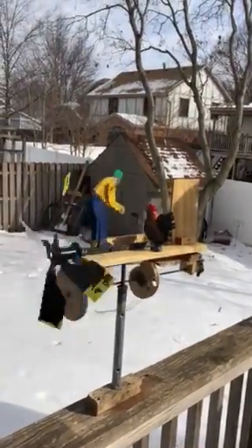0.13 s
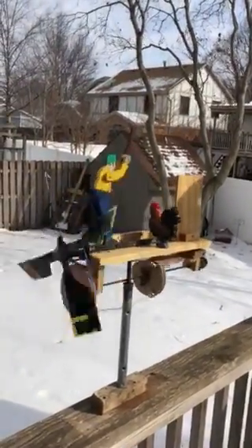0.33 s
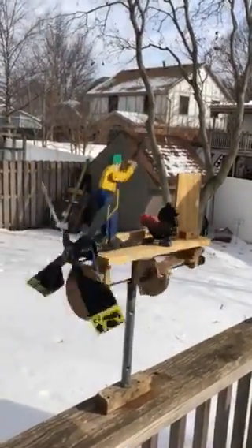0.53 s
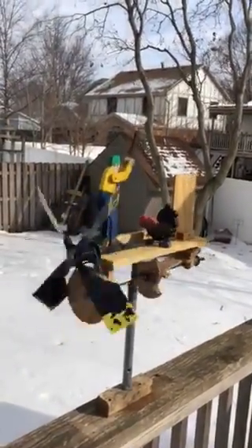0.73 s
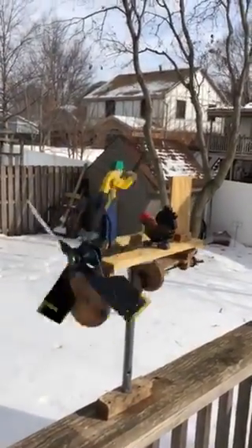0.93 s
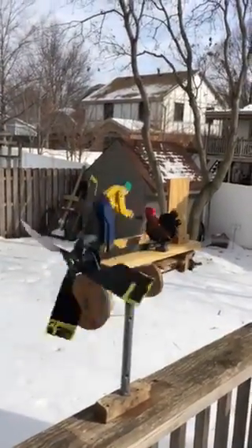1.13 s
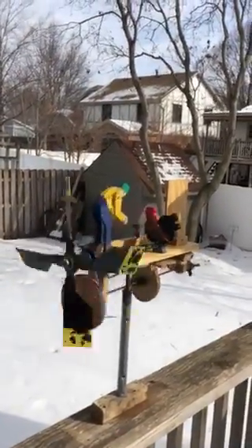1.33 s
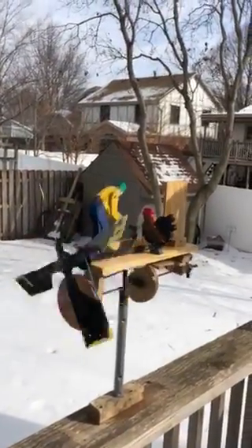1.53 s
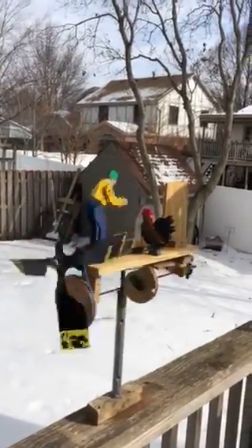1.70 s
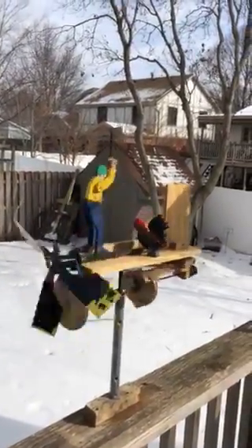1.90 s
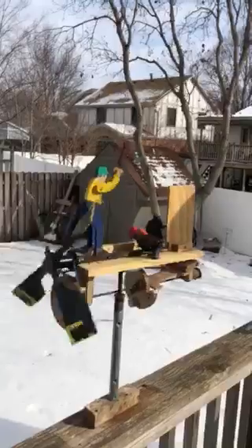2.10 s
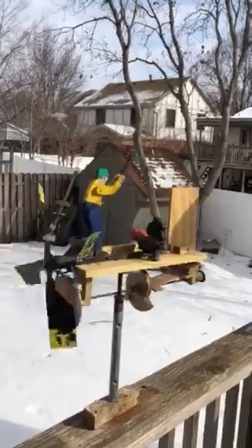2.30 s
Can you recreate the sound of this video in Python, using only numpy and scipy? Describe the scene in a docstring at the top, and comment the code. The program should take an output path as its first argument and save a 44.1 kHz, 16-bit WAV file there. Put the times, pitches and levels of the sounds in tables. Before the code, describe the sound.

Dry, short clacks from a wind-driven wooden toy with a wire crank, sparse at first, denser and sharper around the middle, then sparse again. Wind thumps and flutters on the handheld microphone outdoors, with barely any echo.

```python
"""Whirligig on a windy deck rail

A wooden whirligig's crank and figures clack, rattle and scrape: bursts of contact force ring its modes.
Its wire crank squeaks and some clacks ping, in narrow bands of noise; deck and fence return a faint echo.
Wind on the microphone is shaped noise: low rumble, dull eddies and two hard, fluttering gusts with crackles.
Behind lie a fine hiss of moving air and the faint, steady wash of a snowy yard."""
import sys
import numpy as np
from scipy import signal
from scipy.fft import rfft, irfft
from scipy.io import wavfile
from scipy.ndimage import uniform_filter1d

SR = 44100
rng = np.random.default_rng(int(sys.argv[2]) if len(sys.argv) > 2 else 0)


def int16_out(signal):
    """Quantize to a 16-bit WAV file."""
    q = np.round(np.clip(np.atleast_2d(signal).T, -1, 1) * 32767)
    wavfile.write(sys.argv[1], SR, q.astype(np.int16))


N = 103635

# Wash of the yard, a spectrum: (frequency [Hz], level [dB])
YARD_SPECTRUM = [(120, -11), (200, -1), (482, -7.5), (590, -11.5), (1140, -16.5), (2650, -31), (3690, -33),
                 (5520, -38), (9400, -43.5), (16000, -56)]
YARD_DB = -47.5

# Swells of the airy hiss: (time [s], level [dB])
AIR_LEVELS = [(0, -69), (.22, -67.5), (.42, -61.5), (.7, -69), (.95, -72), (1.08, -79), (1.42, -66),
              (1.72, -65), (1.9, -68), (2.07, -69), (2.35, -65)]
# Spectrum of the airy hiss: (frequency [Hz], level [dB])
AIR_SPECTRUM = [(300, -20), (2500, 6.5), (4500, 2.5), (8000, -2.5), (16000, -8)]

# Wind pressure on the microphone: (time [s], level before RUMBLE_DB [dB])
RUMBLE_LEVELS = [(0.0, -33), (0.06, -54), (0.12, -34), (0.16, -38), (0.22, -25), (0.25, -36.5), (0.28, -21),
                 (0.372, -22), (0.396, -11), (0.432, -17), (0.444, -22.5), (0.468, -19.5), (0.495, -29),
                 (0.55, -33.5), (0.567, -23), (0.595, -30), (0.63, -38), (0.66, -28.5), (0.78, -41.5),
                 (0.84, -35), (0.879, -24.5), (0.92, -34.5), (1.08, -30.5), (1.109, -23.5), (1.17, -32.5),
                 (1.21, -35), (1.248, -20), (1.28, -30.5), (1.43, -25.5), (1.45, -34), (1.65, -34.5),
                 (1.69, -19), (1.75, -31), (1.782, -39), (1.83, -28.5), (1.96, -38), (2.0, -29),
                 (2.05, -42), (2.079, -25), (2.18, -51.5), (2.241, -29), (2.28, -43), (2.35, -47)]
# Spectrum of the rumble before its low-pass: (frequency [Hz], level [dB])
RUMBLE_SPECTRUM = [(15, -52), (30, -21), (48, -3), (65, -0.5), (95, -1.5), (140, -9.5), (220, -15),
                   (400, -29.5), (800, -20), (2000, -62)]
RUMBLE_DB, RUMBLE_TOP_HZ = 0.5, 240

# Single eddies hitting the microphone: (centre time [s], width [s], level [dB], low-pass corner [Hz])
EDDIES = [(0.187, 0.007, -31.5, 212), (0.217, 0.016, -26, 149), (0.293, 0.0076, -25, 202),
          (0.339, 0.0037, -23.5, 360), (0.384, 0.002, -23.5, 374), (0.4238, 0.0033, -16.5, 380),
          (.422, 0.0039, -28, 803), (0.451, 0.004, -18.5, 269), (.461, .007, -14.5, 113),
          (.561, 0.006, -15.5, 124), (.654, 0.0038, -23.5, 280), (0.850, 0.0054, -31, 415),
          (1.024, 0.00093, -23.5, 256), (1.225, 0.011, -34, 320), (1.281, 0.018, -34, 257),
          (1.359, 0.0019, -18.5, 528), (1.387, 0.0015, -21, 594), (1.415, 0.0017, -18.5, 750),
          (1.437, 0.0018, -15.5, 780), (1.502, 0.0048, -13.5, 563), (1.527, 0.0022, -16.5, 990),
          (1.593, 0.0025, -17.5, 820), (1.690, 0.0066, -17, 710), (1.738, 0.0034, -22, 323),
          (1.826, 0.0011, -20, 616), (1.888, 0.0028, -16.5, 570), (1.931, 0.00064, -18.5, 935),
          (1.978, 0.003, -22, 335), (2.036, 0.0018, -17.5, 573), (2.132, 0.002, -32.5, 290),
          (2.232, 0.0068, -29.5, 296)]
EDDY_LOW_SHARE = 0.52  # an eddy holds little below this share of its corner

# Two hard gusts, a list each: (time [s], level before BODY_DB [dB], treble level before TREBLE_DB [dB])
GUSTS = [
    [(1.33, -41, -47), (1.348, -35.5, -71), (1.406, -32, -76), (1.412, -22, -49), (1.438, -16, -30),
     (1.47, -23, -45), (1.498, -14, -29), (1.512, -19, -43), (1.526, -18, -25), (1.584, -20.5, -37),
     (1.594, -15.5, -30), (1.658, -18.5, -24), (1.672, -26.5, -63), (1.676, -19, -30), (1.694, -17.5, -25),
     (1.708, -26, -57), (1.738, -25, -72), (1.75, -73, -86), (1.78, -59, -61)],
    [(1.8, -64, -73), (1.828, -20.5, -59), (1.838, -28.5, -77), (1.862, -18.5, -34), (1.872, -21, -74),
     (1.884, -27.5, -60), (1.892, -31, -66), (1.904, -19.5, -53), (1.922, -21, -58), (1.93, -27.5, -54),
     (1.942, -33.5, -59), (1.96, -27, -57), (1.988, -13.5, -29.5), (2.046, -29, -66), (2.056, -25, -36),
     (2.08, -20.5, -83), (2.09, -44, -69), (2.102, -69, -76), (2.12, -50, -60)],
]
# Spectrum of the gusts' body: (frequency [Hz], level [dB])
GUST_BODY_SPECTRUM = [(30, -26), (80, -5.5), (160, 7.5), (280, 4.5), (500, 5), (750, -7), (1000, -13.5),
                      (1400, -36), (2500, -64)]
# Spectrum of the gusts' treble: (frequency [Hz], level [dB])
GUST_TREBLE_SPECTRUM = [(400, 1), (800, 8), (1100, 2), (1600, -6), (2200, -19.5), (3200, -42.5),
                        (5000, -48), (9000, -51)]
BODY_DB, TREBLE_DB = -1.5, 4.5
FLUTTER_HZ, BODY_FLUTTER_DB, TREBLE_FLUTTER_DB = 130, 1.5, 4.6  # speed limit and depths of the flutter
GUST_EVEN_S = 0.028  # swells slower than this are evened out

# Sharp crackles where a gust slaps the microphone:
# (centre time [s], peak level [dB], half width before the high-pass [ms])
CRACKLES = [(1.416, -35, .17), (1.4438, -8, 0.41), (1.488, -14, 0.3), (1.497, -18, 0.22),
            (1.5299, -11.5, 0.16), (1.5974, -10.5, 0.31), (1.6282, -14.5, 0.22), (1.64, -12.5, 0.17),
            (1.655, -13, 0.29), (1.6805, -20, 0.21), (1.693, -25, 0.21), (1.931, -20, 0.29)]
CRACKLE_ABOVE_HZ = 420

# What the toy rings with: (frequency before MODE_SPREAD [Hz], level [dB], t60 [s])
TOY_MODES = [(1167, 12.5, 0.028), (1402, 8.5, 0.04), (1822, 2.5, 0.02), (2360, 5, 0.035), (3160, -3, 0.027),
             (3757, 0.5, 0.052), (4420, -3.5, 0.047), (6040, -2, 0.01), (6480, -5, 0.0085),
             (8300, -6.5, 0.012), (9430, -9.5, 0.0078), (10770, -15.5, 0.024), (13700, -23, .012)]
# Spectrum of the dry crack of a contact: (frequency [Hz], level [dB])
CRACK_SPECTRUM = [(300, -23), (900, 10.5), (1500, 7), (4000, 0.5), (7000, -10), (10000, -14.5),
                  (16000, -21)]
MODE_SPREAD = 0.027  # share by which the modes shift with the place of contact
KNOCK_BELOW_HZ, SNAP_ABOVE_HZ, SNAP_TOP_HZ = 3800, 13200, 11500  # the top is a gentle low-pass

# A high ping that follows some clacks: (time [s], starting level [dB], t60 [s])
PINGS = [(1.114, -57, 0.082), (1.566, -54, 0.32)]
PING_HZ, PING_WIDTH_HZ = 14500, 160

# Notes of single parts as they are knocked or drag, low from wood, high from the wire crank:
# (time [s], starting level [dB], frequency [Hz], t60 [s])
PART_NOTES = [(0.748, -38, 1410, 0.061), (0.749, -48, 2480, 0.11), (1.135, -42, 1430, 0.087),
              (1.152, -34, 1400, 0.067), (1.234, -39, 1300, 0.16), (1.262, -24.5, 7240, 0.025),
              (1.263, -27.5, 5880, 0.023), (1.264, -29.5, 8860, 0.02), (1.265, -37, 2220, 0.062),
              (1.29, -30.5, 1730, 0.023), (1.326, -35, 1940, 0.024), (2.087, -50, 1340, 0.031),
              (2.298, -33, 4490, 0.018)]
NOTE_WIDTH_HZ, NOTE_RISE_S = 224, 0.00056

# Thin squeaks of the wire crank in its bearings: (start [s], length [s], level at the end of that length [dB])
SQUEAKS = [(0.016, 0.072, -62.5), (0.133, 0.062, -57.5)]
# Resonances of a squeak: (frequency [Hz], width [Hz], level [dB])
SQUEAK_BANDS = [(5600, 590, -5), (8300, 1300, -2.5), (9450, 113, -10), (12300, 570, -4.5),
                (13800, 610, -8.5)]
SQUEAK_GRAIN_HZ, SQUEAK_GRAIN_DB, SQUEAK_RUB_DB = 200, 2, -3

# Wood and wire rubbing and rattling:
# (start [s], length [s], level [dB], hollow knock [dB], bright snap [dB])
SCRAPES = [(0.037, 0.017, -48.5, 0, -15), (0.483, 0.1, -56, 7, -12), (0.644, 0.039, -58, -2, -4.5),
           (0.749, 0.046, -53.5, 6, -5), (0.993, 0.044, -56, -15, -1), (1.132, 0.047, -50, 14, 1),
           (1.19, .03, -68, 2, -13), (1.226, 0.061, -54, 6, -12), (1.309, 0.024, -53.5, -4, -1),
           (1.939, 0.03, -59.5, -8, 2), (2.086, 0.086, -58.5, 16, 5)]
SCRAPE_RISE_S, SCRAPE_RELEASE_S, SCRAPE_FADE_DB = 0.0021, 0.011, -7
SCRAPE_PER_S, SCRAPE_HISS, SCRAPE_CRACK_DB = 320, 0.3, 2  # slips per second and band, hiss gain, crack

# Clacks of the linkage: (time [s], peak level before CLACK_DB [dB], main ring [Hz],
# hollow knock [dB], bright snap [dB], chatter setting [ms])
CLACKS = [(0.0024, -30, 3800, 14.5, 8.5, 7.1), (0.018, -36.5, 3460, -4, -3, 10),
          (0.0356, -27, 6700, -17, -26, 4), (0.0456, -46, 3180, 2, -2, 2.3),
          (0.0802, -34.5, 3380, 14, -7, 7.2), (0.2684, -34.5, 3290, 11, 1.5, 10.5),
          (0.449, -40.5, 4500, -5, 12, 3.2), (0.4884, -41, 4330, -9, 10, 6.3),
          (0.5582, -30.5, 3800, 4, -24, 7.6), (0.5867, -34.5, 3120, 6, 4, 5.4),
          (0.62, -35, 3450, 26, -14, 5.4), (0.627, -38.5, 4500, -5, 19, 5),
          (0.7496, -23, 3670, -19, -8.5, 3.5), (0.7634, -32, 3080, 11, 5, 4.3),
          (0.911, -40.5, 4350, -12, 6, 4), (0.992, -22.5, 5760, -5, -14, 2.2),
          (1.0016, -42, 2900, -12, 10, 2.6), (1.034, -45, 4600, -6, 15, 1.8),
          (1.1135, -22.5, 3660, 1.5, 2, 4.1), (1.1507, -35, 3700, -6, 9, 1.5),
          (1.156, -31.5, 3140, -6, 12, 7.3), (1.175, -32, 3900, -4, -4, 1.8),
          (1.1847, -32, 5760, -23, -23, 4.1), (1.216, -40, 4000, -9, 4, 2.5),
          (1.2217, -31, 3520, 9, -16, 4.7), (1.2438, -32, 3760, -5, 12, 3.6), (1.26, -20, 7340, -2, 5, 5.2),
          (1.2892, -23, 5030, -2, 2, 3.4), (1.31, -36, 3920, -2, -4, 2.1), (1.3212, -34, 3900, -2, -3, 2.7),
          (1.3273, -30.5, 3970, 24, -9, 3.6), (1.3537, -37, 3670, -8, -13, 9),
          (1.5048, -25, 6000, -20, -12, 5), (1.5195, -19, 3680, 1.5, 2, 3), (1.5632, -20, 3820, -4, 0, 1.8),
          (1.7688, -37, 3360, -12, -6, 9.2), (1.944, -34, 3140, -3, -8, 6.6),
          (2.0216, -37, 3220, -10, -30, 8), (2.0884, -29.5, 3330, 20, -12, 5.8),
          (2.1098, -31, 3030, -7, 6, 2.9), (2.145, -30, 3960, -8, 19, 5.6),
          (2.183, -32.5, 3100, -2, 4, 9.5), (2.2987, -23.5, 3890, -2.5, -7, 4.9)]
CLACK_DB, CLACK_CRACK_DB = -11, 2.5
RING_DB, RING_T60_S = -5, 0.0088
RATTLE_DB, RATTLE_S, RATTLE_PER_S = -19.5, 0.0095, 300  # loose parts shiver after each clack

ECHO_DB, ECHO_T60_S = -11.5, 0.17
CUTOFF_HZ = 15900


def amp(db):
    """Turns decibels into gain."""
    return 10 ** (np.asarray(db) / 20)


def unit(x):
    """Scales to rms 1."""
    return x / np.sqrt(np.mean(x ** 2) + 1e-20)


def add(mix, s, sound):
    """Mixes a sound in at time s."""
    part = mix[max(round(s * SR), 0):][:len(sound)]
    part += sound[:len(part)]


def level_curve(points):
    """Gain over the whole scene, drawn through (time [s], level [dB]) points."""
    s, db = np.transpose(points)
    return amp(np.interp(np.arange(N) / SR, s, db))


def colour(x, points):
    """Filters by a spectrum of (frequency [Hz], level [dB]) points."""
    hz, db = np.transpose(points)
    f = np.fft.rfftfreq(len(x), 1 / SR)
    gain = amp(np.interp(np.log(f + 1), np.log(hz + 1), db))
    return irfft(rfft(x) * gain, len(x))


def noise(points):
    """Steady noise of the given spectrum."""
    return unit(colour(rng.standard_normal(N), points))


def steadied(x, span_s):
    """Evens out the slow swells of a noise."""
    window = signal.windows.hann(int(span_s * SR) + 3)
    power = signal.fftconvolve(x ** 2, window, "same")
    return unit(x / np.sqrt(abs(power) + 1e-9))


def band(x, hz, kind, order=2):
    """Causal low-pass or high-pass."""
    sos = signal.butter(order, min(hz, SR / 2 - 1), kind, fs=SR, output="sos")
    return signal.sosfilt(sos, x)


def decay(t, t60):
    """Exponential dying away by 60 dB in t60 seconds."""
    return np.exp(-np.log(1000) * t / t60)


def yard():
    """Faint wash of the snowy yard: steady shaped noise."""
    return amp(YARD_DB) * noise(YARD_SPECTRUM)


def air():
    """Fine hiss of moving air: shaped noise that rises and falls."""
    return level_curve(AIR_LEVELS) * noise(AIR_SPECTRUM)


def rumble():
    """Low wind pressure that swells and drops."""
    low_noise = band(noise(RUMBLE_SPECTRUM), RUMBLE_TOP_HZ, "low")
    return amp(RUMBLE_DB) * level_curve(RUMBLE_LEVELS) * steadied(low_noise, span_s=0.1)


def eddies():
    """Short dull puffs: each a quick swirl of pressure, brighter where its corner is higher."""
    t = np.arange(SR // 5) / SR - 0.1
    out = np.zeros(N)
    for s, width, db, hz in EDDIES:
        shape = np.exp(-(t / width) ** 2 / 2)
        swirl = rfft(rng.standard_normal(len(t)) * shape)
        swirl /= np.sqrt(abs(swirl) + 0.48 * abs(swirl).mean())  # softens peaks of single pitches
        puff = band(irfft(swirl, len(t)), hz, "low", order=4)
        puff = band(puff, EDDY_LOW_SHARE * hz, "high")
        puff *= np.linalg.norm(shape) / np.linalg.norm(puff)
        add(out, s + t[0], amp(db) * puff)
    return out


def gusts():
    """Hard turbulence at the microphone: one fast flutter shakes the body and, more deeply, the treble."""
    t, out = np.arange(N) / SR, np.zeros(N)
    flutter = unit(band(rng.standard_normal(N), FLUTTER_HZ, "low"))
    flutter = np.clip(flutter, -2, 2)
    body = noise(GUST_BODY_SPECTRUM) * amp(BODY_FLUTTER_DB * flutter)
    body = amp(BODY_DB) * steadied(body, GUST_EVEN_S)
    treble = noise(GUST_TREBLE_SPECTRUM) * amp(TREBLE_FLUTTER_DB * flutter)
    treble = amp(TREBLE_DB) * steadied(treble, GUST_EVEN_S)
    for gust in GUSTS:
        s, body_db, treble_db = np.transpose(gust)
        edges = np.clip(np.minimum(t - s[0], s[-1] - t) / 0.0067, 0, 1)
        body_gain = amp(np.interp(t, s, body_db))
        treble_gain = amp(np.interp(t, s, treble_db))
        out += edges * (body * body_gain + treble * treble_gain)
    return out


def crackles():
    """Single steep spikes of pressure, pushing either way."""
    t = np.arange(SR // 50) / SR - 0.01
    out = np.zeros(N)
    for s, db, width_ms in CRACKLES:
        spike = 1 / (1 + (t * 1000 / width_ms) ** 2)
        spike = band(spike, CRACKLE_ABOVE_HZ, "high")
        add(out, s + t[0], amp(db) * rng.choice([-1, 1]) * spike / abs(spike).max())
    return out


def hiss_band(t, hz, width_hz):
    """A fuzzy tone: noise in one narrow resonance."""
    z = rng.standard_normal(len(t)) + 1j * rng.standard_normal(len(t))
    z = band(z, width_hz / 2, "low")
    return unit((z * np.exp(2j * np.pi * hz * t)).real)


def ping(db, t60):
    """A thin, very high ring: a dying fuzzy tone."""
    t = np.arange(SR // 3) / SR
    return amp(db) * hiss_band(t, PING_HZ, PING_WIDTH_HZ) * decay(t, t60)


def part_note(db, hz, t60):
    """A short, rough ring of one part: an evened fuzzy tone that dies away."""
    t = np.arange(SR // 8) / SR
    tone = steadied(hiss_band(t, hz, NOTE_WIDTH_HZ), span_s=0.011)
    return amp(db) * tone * np.minimum(t / NOTE_RISE_S, 1) * decay(t, t60)


def contacts(n, per_s):
    """Random tiny impacts."""
    return unit(rng.standard_normal(n) * (rng.random(n) < per_s / SR))


def grains(n, per_s):
    """Tiny contacts all over the toy: each sounds in its own range of pitch."""
    edges = np.geomspace(700, 16500, 11)
    total = np.zeros(n)
    for low_hz, high_hz in zip(edges, edges[1:]):
        above = band(contacts(n, per_s), low_hz, "high", order=4)
        total += band(above, high_hz, "low", order=4)
    return unit(total)


def rub_edges(t, length):
    """Quick start of a rub and its release after the given length."""
    release = np.exp(-np.maximum(t - length, 0) / SCRAPE_RELEASE_S)
    return np.clip(t / SCRAPE_RISE_S, 0, 1) * release


def squeak(length, db):
    """Grainy rubbing in a few high resonances that starts quickly and fades."""
    t = np.arange(int(length * SR) + SR // 20) / SR
    tones = unit(sum(amp(level) * hiss_band(t, hz, width) for hz, width, level in SQUEAK_BANDS))
    grain = unit(band(rng.standard_normal(len(t)), SQUEAK_GRAIN_HZ, "low"))
    tones = unit(tones * amp(SQUEAK_GRAIN_DB * grain))
    rub = grains(len(t), SCRAPE_PER_S) + rng.standard_normal(len(t))
    rub = unit(band(rub, KNOCK_BELOW_HZ, "low"))
    x = unit(tones + amp(SQUEAK_RUB_DB) * rub)
    return amp(db) * x * rub_edges(t, length) * amp(SCRAPE_FADE_DB * (t / length - 1))


def ring(t, hz, t60):
    """One dying mode of unit energy."""
    mode = np.sin(2 * np.pi * hz * t) * decay(t, t60)
    return mode / np.linalg.norm(mode)


def toy(force, knock_db, snap_db, crack_db):
    """The toy's answer to a contact force: its modes and a dry crack, hollow or bright by where it is touched."""
    t = np.arange(len(force)) / SR
    body = np.zeros(len(t))
    for hz, db, t60 in TOY_MODES:
        shifted_hz = hz * (1 + MODE_SPREAD * rng.standard_normal())
        body += amp(db) * rng.choice([-1, 1]) * ring(t, shifted_hz, t60)
    rung = signal.fftconvolve(force, body / np.linalg.norm(body))[:len(t)]
    crack = colour(np.pad(force, (0, len(t))), CRACK_SPECTRUM)[:len(t)]
    x = rung + amp(crack_db) * crack
    knock = band(x, KNOCK_BELOW_HZ, "low")
    snap = band(band(x, SNAP_ABOVE_HZ, "high"), SNAP_TOP_HZ, "low", order=1)
    middle = band(band(x, KNOCK_BELOW_HZ, "high"), SNAP_ABOVE_HZ, "low")
    return amp(knock_db) * unit(knock) - unit(middle) + amp(snap_db) * unit(snap)


def scrape(length, db, knock_db, snap_db):
    """Small irregular slips over a little hiss; they start quickly and fade."""
    t = np.arange(int(length * SR) + SR // 20) / SR
    slips = grains(len(t), SCRAPE_PER_S) + SCRAPE_HISS * rng.standard_normal(len(t))
    force = rub_edges(t, length) * amp(SCRAPE_FADE_DB * t / length) * slips
    return amp(db) * unit(toy(force, knock_db, snap_db, SCRAPE_CRACK_DB))


def chatter(t, decay_s):
    """A dying burst of contact force that holds all pitches about equally."""
    z = rfft(rng.standard_normal(len(t)) * np.exp(-t / decay_s))
    flat = irfft(z / (abs(z) + 0.2 * abs(z).mean()), len(t))
    burst = flat * np.exp(-t / (4 * decay_s))
    return burst * np.sqrt(decay_s * SR / 2) / np.linalg.norm(burst)


def clack(peak_db, hz, knock_db, snap_db, chatter_ms):
    """A blow that chatters for a few milliseconds, then a faint rattle; both drive the toy and a main ring."""
    t = np.arange(SR // 5) / SR
    blow = chatter(t, max(chatter_ms, 0.5) / 1000)
    rattle = grains(len(t), RATTLE_PER_S) * np.exp(-t / RATTLE_S)
    force = blow + amp(RATTLE_DB) * rattle
    main = signal.fftconvolve(force, ring(t, hz, RING_T60_S))[:len(t)]
    x = unit(toy(force, knock_db, snap_db, CLACK_CRACK_DB)) + amp(RING_DB) * unit(main)
    peak = np.sqrt(uniform_filter1d(x ** 2, size=128).max())  # loudest short-time rms
    return amp(peak_db + CLACK_DB) * x / peak


def echo(x):
    """Faint dull echo from deck and fence: scattered reflections that die away."""
    t = np.arange(SR // 2) / SR
    reflections = contacts(len(t), 2000) * decay(t, ECHO_T60_S) * (t > 0.008)
    reflections /= np.linalg.norm(reflections)
    return amp(ECHO_DB) * band(signal.fftconvolve(x, reflections)[:N], 4900, "low", order=1)


def whirligig():
    """All contacts of the turning toy, with their echo."""
    x = np.zeros(N)
    layers = [(PINGS, ping), (PART_NOTES, part_note), (SQUEAKS, squeak), (SCRAPES, scrape), (CLACKS, clack)]
    for table, sound in layers:
        for s, *settings in table:
            add(x, s, sound(*settings))
    return x + echo(x)


def scene():
    """The quiet yard, the wind and the toy."""
    wind = air() + rumble() + eddies() + gusts() + crackles()
    return (yard() + wind + whirligig())[None]


def record(dry):
    """Takes off the extreme treble with a steep low-pass."""
    low_pass = signal.firwin(511, CUTOFF_HZ, window=("kaiser", 9), fs=SR)
    return signal.oaconvolve(dry, low_pass[None], "same")


dry = scene()
out = record(dry)
int16_out(out)
```